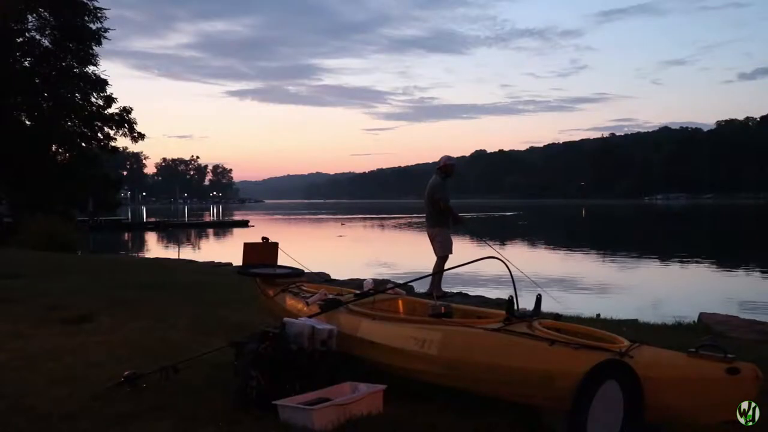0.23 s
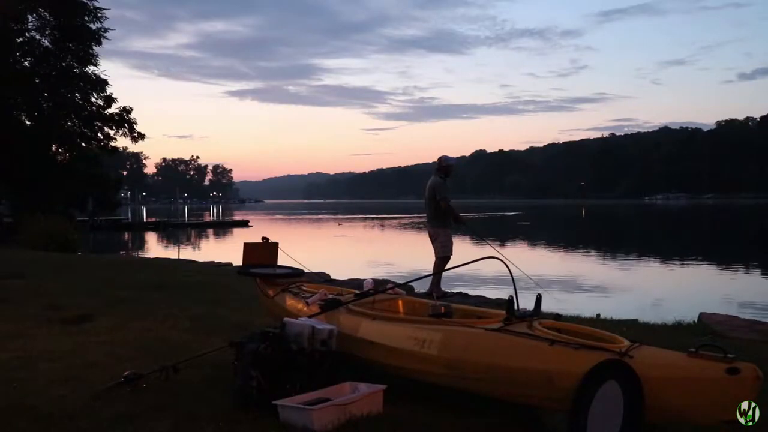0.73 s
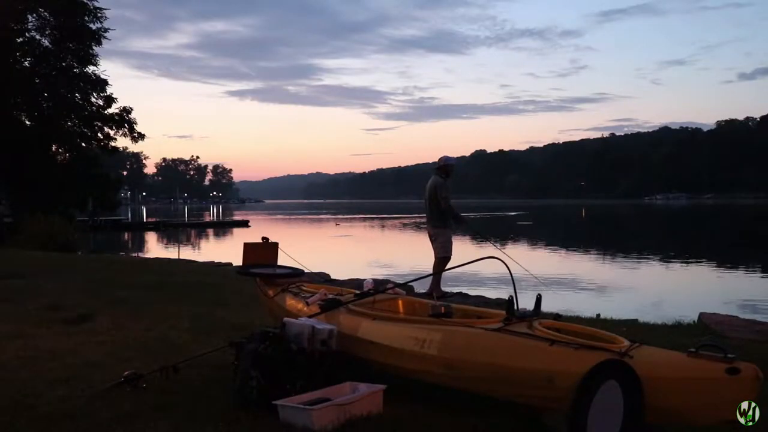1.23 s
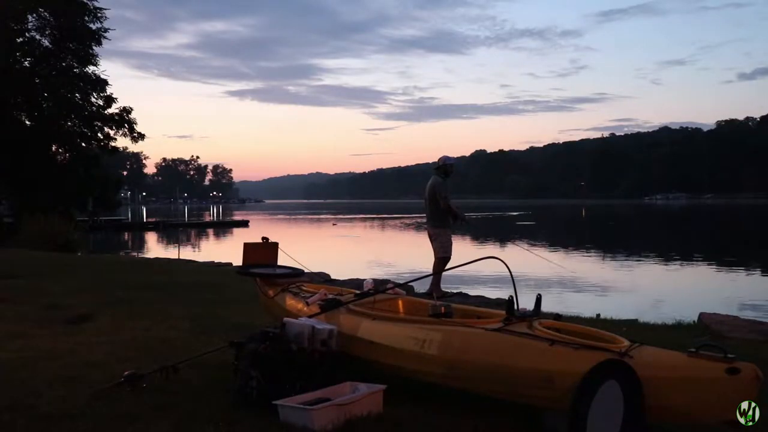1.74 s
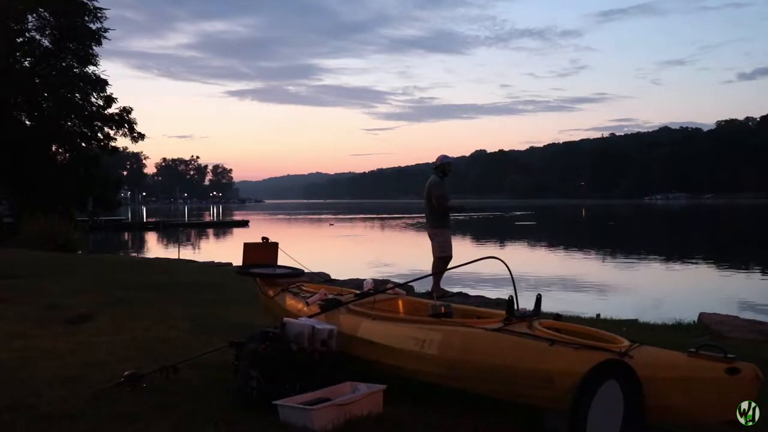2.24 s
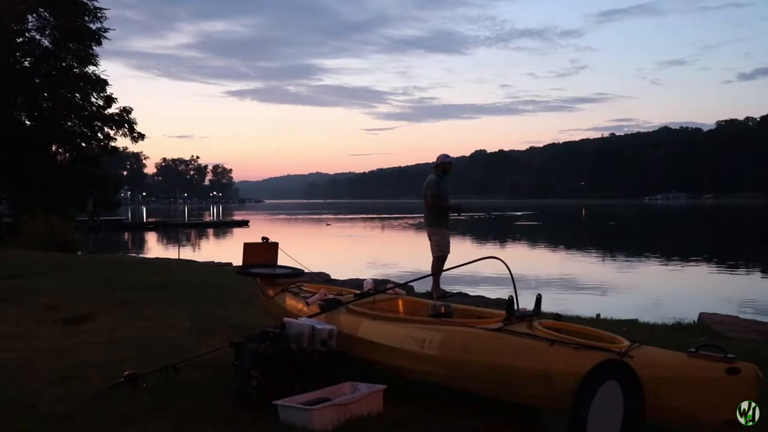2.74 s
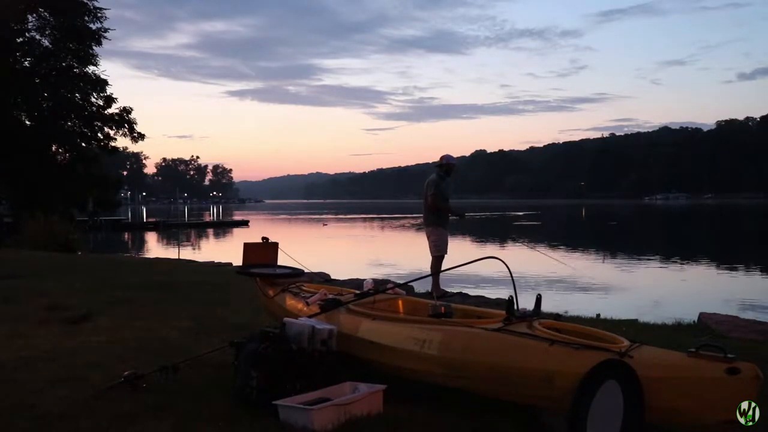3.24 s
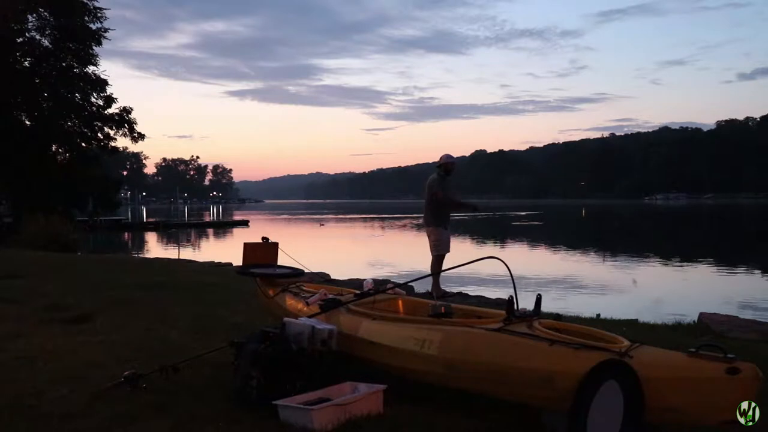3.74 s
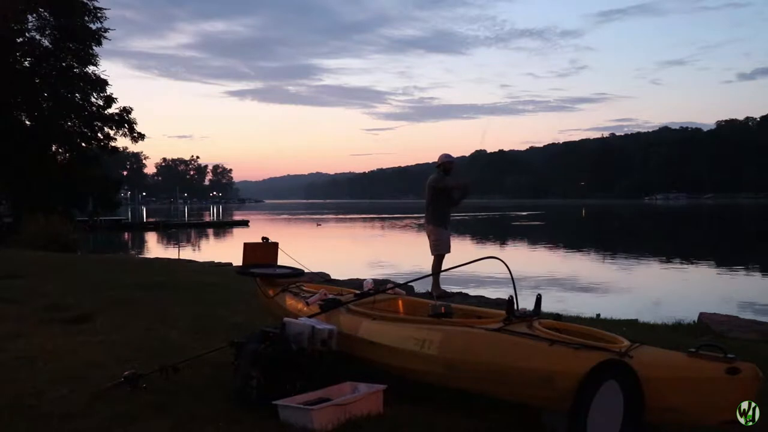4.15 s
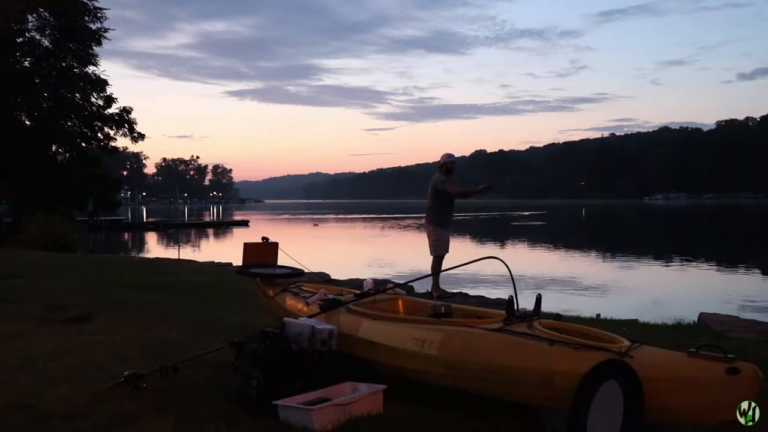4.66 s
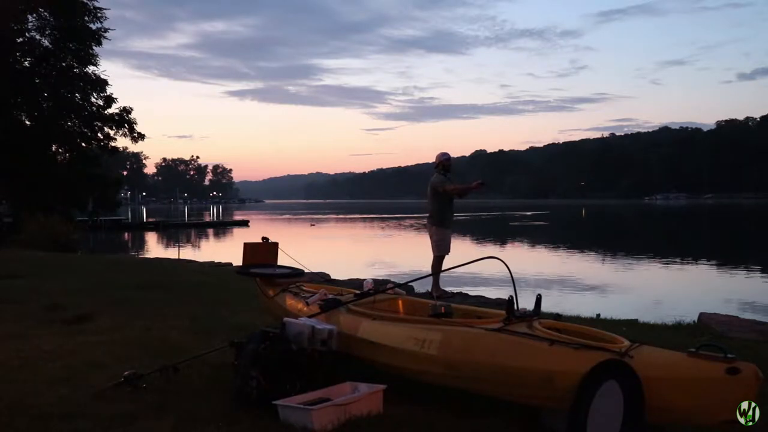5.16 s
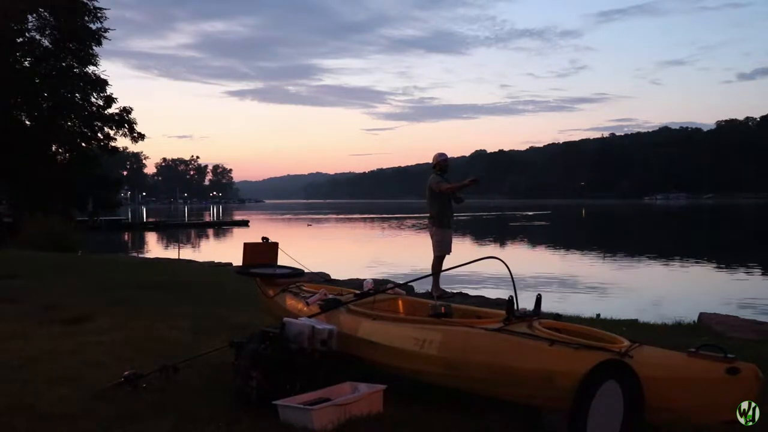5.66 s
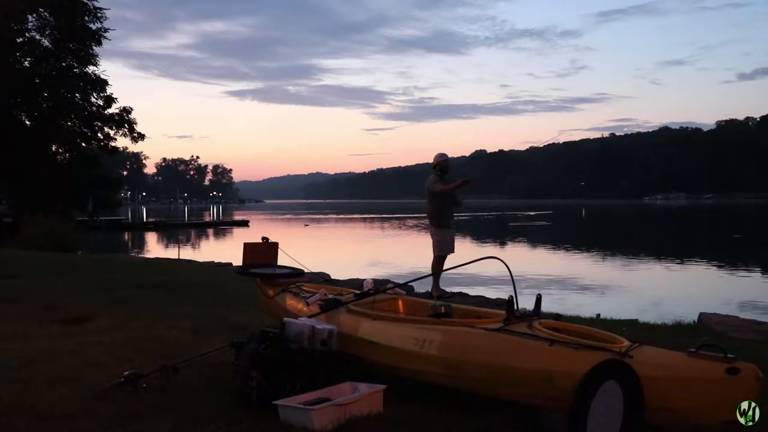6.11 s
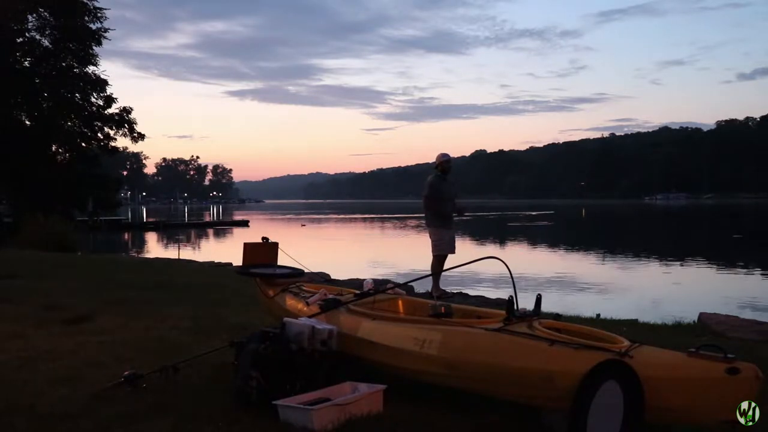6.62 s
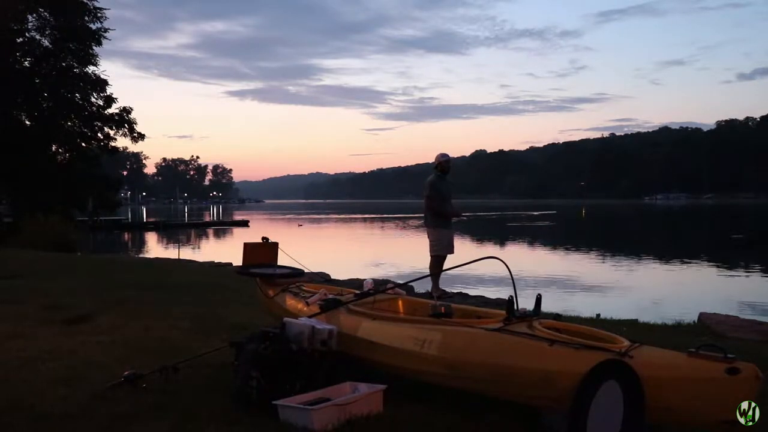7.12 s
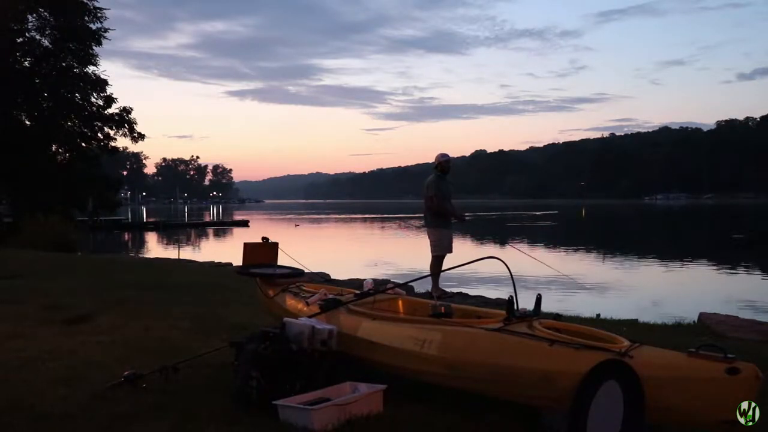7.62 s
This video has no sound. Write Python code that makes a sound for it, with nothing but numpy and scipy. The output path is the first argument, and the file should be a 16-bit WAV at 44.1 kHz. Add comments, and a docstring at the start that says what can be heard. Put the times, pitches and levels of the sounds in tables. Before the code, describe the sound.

Sparrow-like birds chirrup constantly by a dawn lake over a low distant hum, while an angler reels, whips out a cast and clicks the reel.

```python
"""Dawn by a lake: a brief rumble dies away over a steady low bed of far traffic, leaves and faint hums.
From the start sparrow-like birds chirrup as gliding two-voiced tones and one repeats a thin high seet,
all scattered by trunks and leaves; songbirds whistle, a water bird clucks, and later a far dove coos.
An angler reels in with ticks, hiss and scrape, then casts with a noisy swish and a hiss of running line;
late on, the reel snaps shut as cracks that ring its body."""
import sys
import numpy as np
from scipy import signal
from scipy.fft import rfft, irfft
from scipy.io import wavfile
from scipy.ndimage import uniform_filter1d

SR = 44100
rng = np.random.default_rng(int(sys.argv[2]) if len(sys.argv) > 2 else 0)


def pcm_store(signal):
    """Save signal as 16-bit PCM."""
    levels = np.round(np.clip(np.atleast_2d(signal), -1, 1) * 32767)
    wavfile.write(sys.argv[1], SR, levels.astype(np.int16).T)


N = 347508
TIME = np.arange(N) / SR

# the course of each kind of call, before the call's own pitch and length factors:
# time_s from its start, pitch_hz, relative level_db
CALL_SHAPES = { "chirrup": [(0, 4098, 2), (.012, 5100, -11.5), (.032, 5050, -9.5), (.042, 4098, -5.5),
               (.053, 3449, 0), (.062, 3467, -11), (.074, 4140, -8), (.087, 4293, 0), (.099, 3404, -2),
               (.116, 2530, -12)], "cheerp": [(0, 4353, 9), (.011, 4750, -4.5), (.034, 4720, -2.5),
               (.047, 3500, 0), (.062, 3300, -13.5), (.078, 3750, 2.5), (.104, 4200, -2), (.122, 3100, 5)],
               "chilip": [(0, 3940, 9), (.011, 4850, -18), (.027, 4250, 2.5), (.041, 3296, -6),
               (.054, 2900, -31), (.082, 3050, -16), (.096, 3550, 5), (.104, 3940, -5.5),
               (.112, 3218, 25.5)], "chip": [(0, 3900, -7), (.014, 4800, -1), (.03, 4100, 0.5),
               (.045, 3100, 9), (.06, 2860, -5)], "seet": [(0, 4740, -6), (.005, 5630, -1),
               (.009, 7000, -3), (.017, 7260, -4.5), (.024, 6840, -17.5), (.033, 5800, -2)],
               "peep": [(0, 5210, -18), (.008, 5820, -14), (.015, 5900, -17), (.024, 5570, -23)]}
# wet line being wound in: time_s, centre_hz of ticks and hiss, relative level_db
WINDING_COURSE = [(1.7, 11250, -72), (1.86, 10550, -58.5), (2.05, 10000, -69), (2.22, 8330, -55),
                  (2.35, 8860, -55.5), (2.45, 13400, -64), (2.53, 13600, -68)]


def amp(db):
    """Decibels to gain."""
    return 10 ** (np.asarray(db) / 20)


def unit(x):
    """Scales to rms 1."""
    return x / np.sqrt(np.mean(x ** 2) + 1e-20)


def add(mix, start_s, sound):
    """Mixes a sound in at a start time, dropping whatever falls outside the mix."""
    start = round(start_s * SR)
    sound = sound[max(-start, 0):]
    part = mix[max(start, 0):][:len(sound)]
    part += sound[:len(part)]


def wander(n, rate_hz):
    """A random curve of rms about 1, drawn as straight lines between this many knots a second."""
    knots = rng.standard_normal(8192)
    return 1.34 * np.interp(np.arange(n) * rate_hz / SR, np.arange(len(knots)), knots)


def noise(colour):
    """Noise of rms 1 whose spectrum follows (hz, relative db) points along a log-like pitch axis."""
    hz, db = np.transpose(colour)
    bin_hz = np.fft.rfftfreq(N, 1 / SR)
    gain = amp(np.interp(np.log(bin_hz + 1), np.log(hz + 1), db))
    return unit(irfft(rfft(rng.standard_normal(N)) * gain, N))


def fuzzy_tone(hz, width_hz):
    """A narrow band of noise, of rms 1, around a fixed or moving pitch."""
    lowpass = signal.butter(2, width_hz / 2, fs=SR, output="sos")
    band = signal.sosfilt(lowpass, rng.standard_normal(N) + 1j * rng.standard_normal(N))
    phase = 2 * np.pi * np.cumsum(hz * np.ones(N)) / SR
    return unit((band * np.exp(1j * phase)).real)


def scatter(sound, t60, build_s, count):
    """Echoes as random taps that build up and die away, drawn afresh each time, as strong as the sound."""
    delay_s = rng.uniform(.003, .7, count)
    decay = amp(-60 * delay_s / t60)
    height = rng.standard_normal(count) * decay * (1 - np.exp(-delay_s / build_s))
    taps = np.zeros(SR)
    np.add.at(taps, (delay_s * SR).astype(int), height)
    echo = signal.fftconvolve(sound, taps)
    return echo * np.linalg.norm(sound) / np.linalg.norm(echo)


def background():
    """Far traffic and leaves, faint hums, and a low rumble that sags, then dies away faster."""
    # the steady bed's spectrum: pitch_hz, relative level_db per Hz
    air_colour = [(15, -58), (25, -34), (45, -5), (75, -1), (116, -1.5), (183, -2.5), (400, -17),
                  (900, -22), (1500, -25), (3300, -12), (4900, -21.5), (5900, -29), (7700, -41.5),
                  (15500, -42.5)]
    # distant machine hums: pitch_hz, width_hz, level_db
    hum_rows = [(103.2, 30.6, -52), (359.4, 7, -70), (1027, 28, -66.5)]
    # the rumble's spectrum: pitch_hz, relative level_db per Hz
    rumble_colour = [(15, -44), (28, -10), (45, 0.5), (75, 3.5), (130, -1), (250, -27), (430, -23),
                     (600, -30), (1200, -30.5), (3000, -58)]
    air_db, rumble_start_db = -43, -24.5
    turn_s, sag_db_per_s, fall_db_per_s = 0.17, 34, 90

    air = amp(air_db + .3 * wander(N, 3)) * noise(air_colour)
    hums = sum(amp(db + 0.68 * wander(N, 1.96)) * fuzzy_tone(hz, width_hz)
               for hz, width_hz, db in hum_rows)
    sag_db = sag_db_per_s * np.minimum(TIME, turn_s)
    fall_db = fall_db_per_s * np.maximum(TIME - turn_s, 0)
    rumble = amp(rumble_start_db - sag_db - fall_db) * noise(rumble_colour)
    return air + hums + rumble


def syllable(kind, pitch, length, second_ratio=.89, flutter_db=2.5):
    """One call: a gliding whistle, overtones, and a lower tone from the other side of the syrinx."""
    # each kind's voice: pitch jitter as a share, second_voice_db, octave_overtone_db
    voice_rows = {"chirrup": (0.013, -16, -35), "cheerp": (.014, 2, -26), "chilip": (.01, -10, -59),
                  "chip": (0.019, -12, -42), "seet": (0.0044, -55, -49), "peep": (0.0085, -26, -25)}
    s, hz, db = np.transpose(CALL_SHAPES[kind])
    jitter, second_db, octave_db = voice_rows[kind]
    t = np.arange(0, s[-1], 1 / (SR * length))
    smooth_hz = uniform_filter1d(np.interp(t, s, hz), size=200)
    glide_hz = smooth_hz * pitch * (1 + jitter * wander(len(t), 908))
    phase = 2 * np.pi * np.cumsum(glide_hz) / SR
    tone = np.sin(phase) + amp(second_db) * np.sin(second_ratio * phase)
    # the two tones mix in the throat: weak octaves and sum tones
    overtones = tone ** 2 + 0.29 * tone ** 3
    tone += amp(octave_db) * signal.lfilter(*signal.butter(4, 6500, "high", fs=SR), overtones)
    level = amp(np.interp(t, s, db) + flutter_db * wander(len(t), 352.6))
    return unit(tone * level * signal.windows.tukey(len(t), .14))


def through_trees(kind, call, wet_db, branch_db=-6, grove_db=-3, woods_db=-5):
    """A call arrives directly, off nearby branches, from the next trees, and from the woods around."""
    first_hz = CALL_SHAPES[kind][0][1]
    woods_t60 = 0.5 * (4000 / first_hz) ** 0.64  # high calls die sooner in the leaves
    out = amp(wet_db + woods_db) * scatter(call, t60=woods_t60, build_s=0.17, count=160)
    out += amp(wet_db + grove_db) * scatter(call, t60=.27, build_s=.012, count=220)
    out += amp(branch_db) * scatter(call, t60=0.11, build_s=0.0037, count=300)
    add(out, 0, amp(-2.0) * call)
    return out / np.hypot(1, amp(wet_db))  # more echo means less direct sound


def near_birds():
    """Sparrow-like birds call near and far; the seet and the peep each keep one balance of echo."""
    # each kind's calls: start_s, pitch factor, length factor, level_db
    chirp_rows = { "chirrup": [(.745, 0.91, 1, -35), (1.092, .99, 0.97, -28), (1.67, 0.9, 0.93, -36),
                  (1.862, 0.97, 0.99, -27.5), (3.09, 0.99, 0.94, -35.5), (4.104, .99, .98, -28),
                  (5.02, 1, .85, -33), (5.622, 1, 1.08, -28.5), (6.353, 0.98, 0.99, -29),
                  (7.535, 0.98, 0.88, -34.5)], "cheerp": [(-.06, 0.82, 1.4, -37.5), (.19, .96, 0.74, -34),
                  (.645, 1, 1.14, -33), (1.324, 0.94, 0.67, -35), (1.489, 1.028, 0.9, -31.5),
                  (2.15, 1.01, 0.98, -40.5), (2.415, .99, 0.98, -30), (3.305, 1.08, 0.86, -32),
                  (3.688, .96, 1.04, -37), (3.925, 0.9, 0.85, -38.5), (4.321, 1.01, .97, -33.5),
                  (4.419, .97, 0.84, -38), (5.276, 1.01, 0.94, -31), (6.309, 1.026, 0.85, -29.5),
                  (6.874, 1, 0.7, -36.5), (7.358, 1.006, 0.93, -32)], "chilip": [(.362, 1.005, 0.9, -29),
                  (2.638, 1.005, 0.86, -29.5), (3.367, 0.94, 0.81, -30.5), (4.877, .99, .92, -29),
                  (7.202, 1.027, .92, -31)], "chip": [(.99, .93, 0.93, -39), (3.004, 1.02, 1.03, -36),
                  (3.875, 1.04, 1.07, -37.5), (5.99, 1.07, .92, -38), (6.046, .99, 0.7, -35),
                  (6.16, 1, 1.14, -45), (6.705, 0.94, 0.74, -38)]}
    # one bird's unchanging seet: start_s, level_db
    seet_rows = [(0.056, -39.5), (.792, -39), (1.51, -40.5), (2.504, -41), (3.452, -41.5), (4.791, -39),
                 (5.548, -41), (6.202, -40.5), (6.862, -38.5), (7.825, -41)]
    # another bird's soft peeps: start_s, pitch factor, level_db
    peep_rows = [(1.005, 0.94, -44.5), (1.816, 1, -45), (2.339, 0.95, -41), (2.474, 1.03, -45),
                 (3.134, 1.07, -49.5), (3.27, 1.08, -49), (4, .96, -43.5), (4.999, 1.02, -43),
                 (5.243, 1.07, -44.5), (6.102, .96, -45.5)]
    # fainter calls come from farther off, so they carry more echo, up to a limit
    even_db, wet_per_db, wettest_db = -35, 1.56, 2
    seet_pitch, seet_length, seet_wet_db = 0.97, 1.05, 6.5
    peep_length, peep_wet_db = 1.07, -1.5

    out = np.zeros(N)
    for kind, rows in chirp_rows.items():
        for s, pitch, length, db in rows:
            wet_db = min(wet_per_db * (even_db - db), wettest_db)
            add(out, s, amp(db) * through_trees(kind, syllable(kind, pitch, length), wet_db))
    for s, db in seet_rows:
        call = syllable("seet", seet_pitch, seet_length)
        add(out, s, amp(db) * through_trees("seet", call, seet_wet_db))
    for s, pitch, db in peep_rows:
        call = syllable("peep", pitch, peep_length)
        add(out, s, amp(db) * through_trees("peep", call, peep_wet_db))
    return out


def far_flock(level_db=-45.5, pitch=.92, count=84):
    """More of the same birds far off: only their echoes arrive, and the air has taken the treble."""
    out = np.zeros(N)
    for k, (when, tune, size) in enumerate(rng.random((count, 3))):
        kind = ("chirrup", "chilip", "chip")[k % 3]
        call = syllable(kind, pitch * (1 + .22 * (tune - .5)), 1.0)
        distance_db = 6 * (size - .5)
        start_s = (k + when - 2) / (count - 2) * N / SR
        echoes = scatter(call, t60=.55, build_s=.004, count=90)
        add(out, start_s, amp(level_db + distance_db) * echoes)
    return signal.lfilter(*signal.butter(3, 4100, fs=SR), out)


def whistle(hz, envelope, waver=0.0026, shimmer_db=4.0):
    """A pure tone that follows a pitch curve and shimmers a little on its way through the air."""
    phase = 2 * np.pi * np.cumsum(hz * (1 + waver * wander(len(hz), 80.7))) / SR
    return np.sqrt(2) * np.sin(phase) * envelope * amp(shimmer_db * wander(len(hz), 35.5))


def slur(length_s, start_hz, end_hz):
    """A falling whistle that flattens out toward its end."""
    u = np.linspace(0, 1, int(length_s * SR))
    fall_hz = end_hz + (start_hz - end_hz) * (1 - u) ** 1.6
    return whistle(fall_hz, unit(signal.windows.tukey(len(u), .7)))


def far_songbirds(level_db=-62, carry_db=9, count=60):
    """Faint falling slurs from all along the shore; the higher ones carry more."""
    out = np.zeros(N)
    for k, (when, tune, span) in enumerate(rng.random((count, 3))):
        hz = 2000 + 1100 * tune
        tone = amp(level_db + carry_db * tune) * slur(0.07 + .12 * span, hz, .84 * hz)
        add(out, (k + when - 1) / count * N / SR, tone)
    return amp(-4) * out + amp(-5) * scatter(out, t60=0.45, build_s=0.017, count=300)[:N]


def rise(length_s, start_hz, end_hz, soft_at):
    """A whistle that climbs ever faster and swells, softening once on the way."""
    bend, taper, swell_db = 0.3, 0.27, 9.5
    soft_db, soft_width = 16, 0.1  # width as a share of the whistle's length
    u = np.linspace(0, 1, int(length_s * SR))
    db = swell_db * u - soft_db * np.exp(-((u - soft_at) / soft_width) ** 2)
    climb = (1 - bend) * u + bend * u ** 3
    envelope = unit(signal.windows.tukey(len(u), taper) * amp(db))
    return whistle(start_hz + (end_hz - start_hz) * climb, envelope)


def songbirds(echo_db=-7):
    """Rising whistles and falling slurs that linger across the water."""
    # rising whistles: start_s, length_s, start_hz, end_hz, level_db, place of the soft moment (0-1)
    rise_rows = [(0.189, 0.12, 2410, 2506, -42, .85), (.28, .17, 2584, 2690, -47.5, 0.86),
                 (2.052, 0.55, 1780, 3037, -46.5, 0.31), (3.109, .56, 1662, 3043, -43.5, 0.42)]
    # falling slurs: start_s, length_s, start_hz, level_db
    slur_rows = [(.512, .07, 2100, -59), (.53, 0.35, 2740, -55.5), (.72, .14, 2300, -55),
                 (.856, .075, 2200, -62), (2.77, .12, 2142, -60), (3.5, 0.12, 2050, -63.5),
                 (3.857, 0.078, 2155, -54), (4.023, 0.061, 2165, -54), (4.171, .07, 2160, -51),
                 (4.41, 0.14, 2180, -57), (4.885, 0.11, 2190, -54), (4.975, 0.12, 2235, -55.5),
                 (5.24, 0.13, 2300, -76), (5.426, .135, 2273, -53.5), (5.639, .27, 2067, -60),
                 (6.511, .1, 2050, -66), (6.814, 0.1, 2100, -68), (7.13, 0.06, 2080, -69),
                 (7.418, 0.065, 2200, -66), (7.74, 0.083, 2035, -64)]
    out = np.zeros(N)
    for s, length_s, start_hz, end_hz, db, soft_at in rise_rows:
        add(out, s, amp(db) * rise(length_s, start_hz, end_hz, soft_at))
    for s, length_s, start_hz, db in slur_rows:
        add(out, s, amp(db) * slur(length_s, start_hz, .765 * start_hz))
    return out + amp(echo_db) * scatter(out, t60=1.5, build_s=0.0076, count=400)[:N]


def water_bird(length_s=0.031):
    """A far water bird's short soft clucks, hoarse because their pitch jitters."""
    # clucks: start_s, pitch_hz, level_db
    cluck_rows = [(.19, 910, -48), (.835, 940, -53), (1.36, 887, -54), (1.485, 1000, -52),
                  (1.71, 1060, -53), (1.78, 1380, -52.5)]
    out, swell = np.zeros(N), np.hanning(int(length_s * SR))
    for s, hz, db in cluck_rows:
        phase = 2 * np.pi * np.cumsum(hz * (1 + 0.09 * wander(len(swell), 395))) / SR
        add(out, s, amp(db) * unit(swell * np.sin(phase)))
    return out


def dove(echo_db=-4):
    """Soft level coos from far away, blurred by the woods."""
    # coos: start_s, length_s, pitch_hz, level_db
    coo_rows = [(1.6, 0.33, 498, -62.5), (2.62, .36, 487, -63), (4.5, 0.34, 524.6, -60),
                (5.36, 0.35, 485, -62.5), (6.58, 0.38, 484.5, -62), (7.38, 0.83, 480, -60)]
    out = np.zeros(N)
    for s, length_s, hz, db in coo_rows:
        swell = signal.windows.tukey(int(length_s * SR), .6)
        coo = whistle(np.full(len(swell), hz), swell, waver=0.019, shimmer_db=1.5)
        add(out, s, amp(db) * coo)
    return out + amp(echo_db) * scatter(out, t60=1.0, build_s=0.016, count=200)[:N]


def fizz(rows, spread_db=11.0, per_s=900):
    """Wet line flicks through the rod's rings: tiny ticks, each with a pitch of its own."""
    s, hz, db = np.transpose(rows)
    out, window = np.zeros(N), np.hanning(48)
    span_s = s[-1] - s[0]
    tick_t = np.arange(len(window)) / SR
    for when, tune, size in rng.random((4000, 3))[:int(per_s * span_s)]:
        at = s[0] + when * span_s
        tick_hz = np.interp(at, s, hz) * (0.59 + 0.9 * tune)
        tick_db = np.interp(at, s, db) + spread_db * np.log(size + .03)
        add(out, at, amp(tick_db) * window * np.sin(2 * np.pi * tick_hz * tick_t))
    return out


def rush(rows, width_hz, broad_db, colour, flutter_db):
    """Air or line rushing by: a noisy whistle that follows the speed, over a broad hiss, fluttering as one."""
    s, hz, db = np.transpose(rows)
    level_db = np.interp(TIME, s, db, left=-140, right=-140)
    level = amp(level_db + flutter_db * wander(N, 260))
    noisy_whistle = fuzzy_tone(np.interp(TIME, s, hz), width_hz)
    return level * (noisy_whistle + amp(broad_db) * noise(colour))


def scrape(level_db=-2, uneven_db=5, turn_hz=28):
    """The turning reel rubs in a few high bands, each coming and going."""
    # scraping bands: centre_hz, width_hz, relative level_db
    band_rows = [(7250, 650, 5), (8400, 700, -6), (9750, 700, -3), (12300, 1200, -4)]
    s, _, db = np.transpose(WINDING_COURSE)
    bands = sum(amp(band_db + uneven_db * wander(N, turn_hz)) * fuzzy_tone(hz, width_hz)
                for hz, width_hz, band_db in band_rows)
    return amp(level_db + np.interp(TIME, s, db, left=-140, right=-140)) * unit(bands)


def angler(wake_db=-10, ticks_db=-2, hiss_db=-16):
    """Winding in, the whip of the rod, and the line paying out."""
    # the rod's swish: time_s, whistle_hz, whistle level_db
    swish_rows = [(4.512, 1840, -47), (4.526, 2803, -26), (4.536, 5200, -28.5), (4.545, 7600, -31.5),
                  (4.556, 10240, -35), (4.57, 12400, -38), (4.61, 12900, -60)]
    # line running off the spool: time_s, hiss_hz, narrow hiss level_db
    line_rows = [(4.54, 13500, -64), (4.62, 13300, -63), (4.68, 12800, -54), (4.76, 11500, -59),
                 (4.86, 9600, -60), (5.0, 7800, -68), (5.15, 7000, -85)]
    # spectra of the broad hiss: pitch_hz, relative level_db
    line_colour = [(300, -18), (1500, 4.5), (7000, -4.5), (11500, -7), (16000, -22)]
    swish_colour = [(150, -12), (350, -4), (540, -0.5), (800, -5.5),
                    (1800, -0.5), (4000, -9), (15000, -20)]

    hiss = rush(WINDING_COURSE, width_hz=4300, broad_db=19.5, colour=line_colour, flutter_db=2.0)
    winding = amp(ticks_db) * fizz(WINDING_COURSE) + amp(hiss_db) * hiss + scrape()
    swish = rush(swish_rows, width_hz=1500, broad_db=-8.5, colour=swish_colour, flutter_db=4.0)
    # the trees give back mostly the low part of the swish
    echoes = scatter(swish, t60=0.91, build_s=0.012, count=900)[:N]
    wake = signal.lfilter(*signal.butter(1, 4500, fs=SR), echoes)
    running = rush(line_rows, width_hz=1400, broad_db=4, colour=line_colour, flutter_db=2)
    return winding + swish + amp(wake_db) * wake + running


def reel(crack_db=-0.5, crack_t60=0.014):
    """Each click is a brief crack that rings the reel's body."""
    # clicks: start_s, level_db, dullness as a lowpass_hz
    click_rows = [(3.7, -31.5, 14000), (3.705, -37, 4996), (6.211, -36.5, 14000), (7.312, -41, 14760),
                  (7.316, -36, 15000), (7.3189, -21.5, 4970), (7.322, -33, 5900), (7.3295, -39, 14900)]
    # the body's modes: pitch_hz, relative level_db, t60_s
    mode_rows = [(763, -16, 0.042), (1082, -9.5, 0.032), (2400, 4, 0.0088), (2770, 0.5, 0.01),
                 (3300, 9, 0.011), (6680, -3, 0.0061), (13000, -4, 0.011)]
    out, t = np.zeros(N), np.arange(4096) / SR
    for s, db, dull_hz in click_rows:
        ring = sum(amp(mode_db - 60 * t / t60) * np.sin(2 * np.pi * (hz * t + rng.random()))
                   for hz, mode_db, t60 in mode_rows)
        crack = amp(crack_db - 60 * t / crack_t60) * rng.standard_normal(len(t))
        click = amp(db) * signal.lfilter(*signal.butter(1, dull_hz, fs=SR), ring + crack)
        add(out, s, click)
        add(out, s, amp(-6) * scatter(click, t60=0.12, build_s=0.0032, count=1500))
    return out


def scene():
    """Everything reaches one microphone, alike in both channels."""
    birds = near_birds() + far_flock() + far_songbirds() + songbirds() + water_bird() + dove()
    mono = background() + birds + angler() + reel()
    return np.array([mono, mono])


def record(dry):
    """The recorder's band limit: a steep low-pass."""
    edge_hz = 15800
    lowpass = signal.firwin(511, edge_hz, window=("kaiser", 9), fs=SR)
    return signal.oaconvolve(dry, lowpass[None], "same")


dry = scene()
out = record(dry)
pcm_store(out)
```